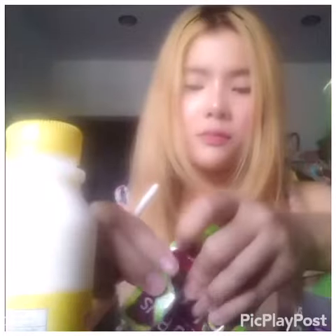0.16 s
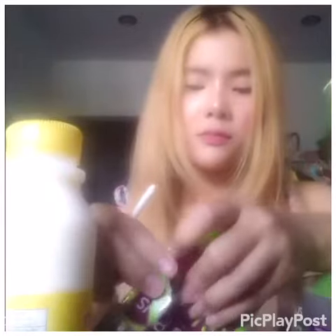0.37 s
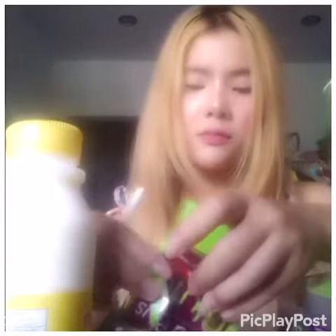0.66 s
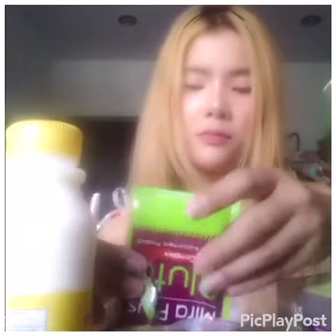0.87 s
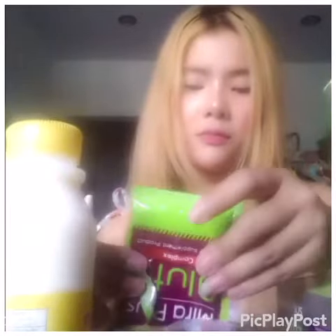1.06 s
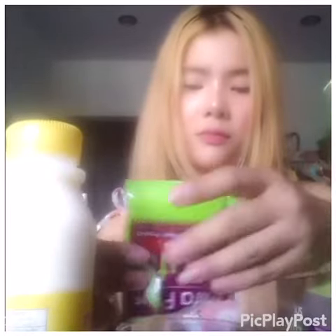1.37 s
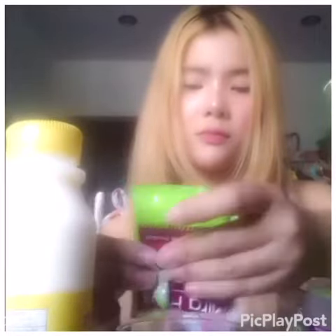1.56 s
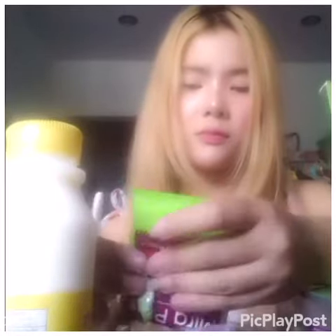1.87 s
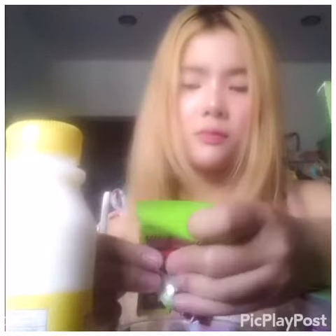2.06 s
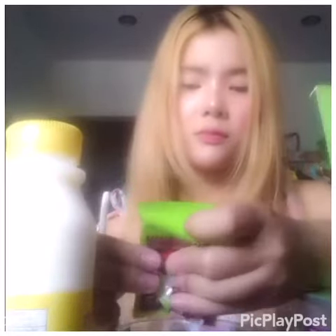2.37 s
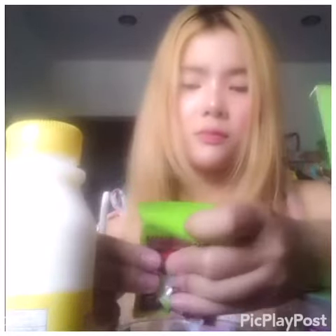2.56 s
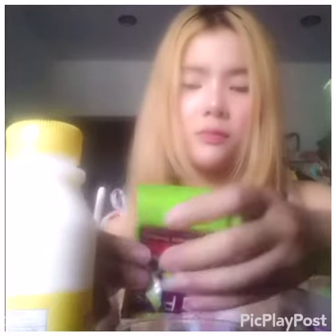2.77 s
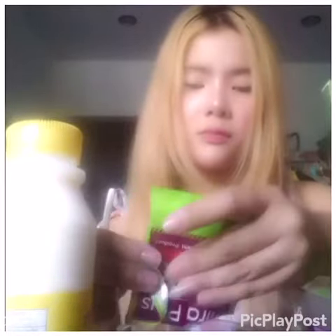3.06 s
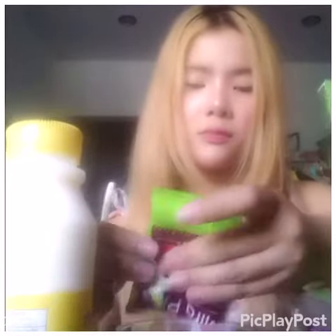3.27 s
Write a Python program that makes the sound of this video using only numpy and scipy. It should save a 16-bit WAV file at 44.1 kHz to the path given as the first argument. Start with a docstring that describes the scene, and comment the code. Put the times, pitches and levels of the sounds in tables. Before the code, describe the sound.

Crisp plastic packet crackling in uneven bursts, handled by fingers near a small microphone.

```python
"""Over faint room rumble and hiss, a foil-lined plastic sachet rustles and snaps, squeezed and worked open by hand.
A small microphone stands close by. Each flex of the film gives a train of tiny ringing creases and sliding hiss;
larger creases snap through one by one as short noise bursts with a ringing facet, and panels give with dull bumps.
The pouch's resonances colour the rustle and the noise of the snaps; the room answers with early reflections
and a short tail."""
import sys
import numpy as np
from scipy import signal
from scipy.fft import rfft, irfft, next_fast_len
from scipy.io import wavfile
from scipy.ndimage import map_coordinates

SR = 44100
rng = np.random.default_rng(int(sys.argv[2]) if len(sys.argv) > 2 else 0)


def to_wav(sig):
    """Store sig (one row per channel, or 1-D mono) as 16-bit WAV at the path in sys.argv[1].

    Samples outside -1..1 are clipped; the rate is SR.
    """
    pcm = np.clip(np.atleast_2d(sig), -1, 1) * 32767
    pcm = np.round(pcm).astype(np.int16)
    wavfile.write(sys.argv[1], SR, pcm.T)  # frames by channels


N = 149940

# shape of the flexed film: time_s, treble_against_rest_db, panel_resonance_hz
FILM_SHAPE = [(.86, 4.5, 1005), (1.22, 1.5, 940), (1.4, 4.5, 740), (1.56, 1, 1080), (1.7, -0.5, 1110),
              (1.92, -2.5, 460), (2.1, 7.5, 800), (2.4, 1.5, 814), (2.8, 5.5, 1060), (2.98, 6, 830),
              (3.2, .5, 785)]


def amp(db):
    """Decibels to a linear factor."""
    return 10 ** (np.asarray(db) / 20)


def unit(x):
    """Scale to an RMS of 1."""
    return x / np.sqrt(np.mean(x ** 2) + 1e-20)


def decay(t, t60):
    """Exponential fall by 60 dB in t60 seconds."""
    return np.exp(-np.log(1000) * t / t60)


def along(points, hz):
    """Interpolate (Hz, value) points on a log-frequency axis."""
    f, v = np.transpose(points)
    return np.interp(np.log(hz + 1), np.log(f + 1), v)


def curve(rows):
    """Interpolate (s, value) points to one value per sample."""
    return np.interp(np.arange(N) / SR, *np.transpose(rows))


def wobble(rate):
    """A smooth random curve with rate knots a second."""
    knots = rng.standard_normal(int(N * rate / SR) + 4)
    return map_coordinates(knots, [np.arange(N) * rate / SR])


def filtered(x, gain):
    """Minimum-phase filter: the folded cepstrum turns a gain over frequency into a causal response."""
    n = x.shape[-1]
    m = 2 * next_fast_len(n)
    log_gain = np.log(np.maximum(gain(np.fft.rfftfreq(m, 1 / SR)), 1e-6))
    cepstrum = irfft(log_gain, m)
    cepstrum[..., 1:m // 2] *= 2
    cepstrum[..., m // 2 + 1:] = 0
    return irfft(rfft(x, m) * np.exp(rfft(cepstrum)), m)[..., :n]


def band(hz, lo, hi, order=6):
    """Gain of a band-pass with smooth shoulders."""
    low_side = 1 + (lo / (hz + 1)) ** (2 * order)
    high_side = 1 + (hz / hi) ** (2 * order)
    return (low_side * high_side) ** -.5


def hump(hz, centre_hz, octaves):
    """A bell of height 1 on a log-frequency axis."""
    return np.exp(-.5 * (np.log2((hz + 1) / centre_hz) / octaves) ** 2)


def floor():
    """Steady room rumble and hiss: noise shaped over frequency."""
    # colour of the room noise: frequency_hz, relative_level_db
    floor_colour = [(28, -19), (40, 2), (60, -7), (135, 3.5), (200, 1.5), (300, -7), (1200, -16.5),
                    (4300, -30.5), (6800, -28), (8800, -26.5), (9450, -11), (10100, -44)]
    floor_db = -52.5
    noise = rng.standard_normal(N)
    return amp(floor_db) * unit(filtered(noise, lambda hz: amp(along(floor_colour, hz))))


def room(x):
    """Early reflections from table and hands, and a short diffuse tail, both made of decaying noise."""
    # decay of the tail: frequency_hz, t60_s
    tail_decay = [(200, 0.3), (1000, 0.085), (4000, 0.23), (10000, 0.07)]
    tail_db, early_db = -19.5, -11.5  # energy of each
    tail_rise_s, early_delay_s, early_fade_s = 0.0072, 0.00209, 0.0027
    hz, t, z = signal.stft(rng.standard_normal(SR // 2), SR, nperseg=256)
    t60_s = along(tail_decay, hz)[:, None]
    tail = signal.istft(z * decay(t, t60_s), SR, nperseg=256)[1]
    t = np.arange(len(tail)) / SR
    tail *= 1 - np.exp(-t / tail_rise_s)
    early = rng.standard_normal(len(t)) * (t > early_delay_s) * np.exp(-t / early_fade_s)
    answer = amp(tail_db) * tail / np.linalg.norm(tail)
    answer += amp(early_db) * early / np.linalg.norm(early)
    return signal.fftconvolve(x, answer)[:N]


def bumps():
    """A whole panel of the pouch gives under the fingers with a soft puff of low noise."""
    # dull bumps: start_s, level_db
    bump_rows = [(.354, -29), (.811, -26), (1.405, -23.5), (1.458, -24), (1.795, -33.5), (1.947, -26),
                 (3.019, -29)]
    lo_hz, hi_hz, t60_s, rise_s = 272, 520, 0.043, 0.0027
    t = np.arange(N) / SR
    push = np.zeros(N)
    for start_s, level_db in bump_rows:
        age = np.maximum(t - start_s, 0)
        push += amp(level_db) * (1 - np.exp(-age / rise_s)) * decay(age, t60_s)
    noise = rng.standard_normal(N)
    return push * unit(filtered(noise, lambda hz: band(hz, lo_hz, hi_hz, order=3)))


def pouch(hz):
    """Gain of the pouch's resonances as they reach the microphone."""
    # resonances: frequency_hz, gain_db
    pouch_gain = [(150, -15.5), (280, -5.5), (380, 5.5), (540, -1.5), (780, 4), (1090, 4), (1420, -7),
                  (1720, 0.5), (2050, -3), (2650, 2.5), (3100, 2), (3700, -4.5), (4350, -10.5),
                  (5600, -4.5), (6700, 0.5), (8300, -2), (9000, -6.5), (9500, 8), (9900, -3.5),
                  (10300, -32.5)]
    return amp(along(pouch_gain, hz))


def panel(x):
    """The bent panel's resonance slides in pitch as the grip changes."""
    peak_db, width_octaves = 2.5, .25
    hz, t, z = signal.stft(x, SR, nperseg=512)
    s, _, centre_hz = np.transpose(FILM_SHAPE)
    bell = hump(hz[:, None], np.interp(t, s, centre_hz), width_octaves)
    return signal.istft(z * amp(peak_db * bell), SR, nperseg=512)[1][:N]


def crackle(count=7, size=6000):
    """A dense train of tiny creases of uneven size, each ringing a few modes (count) of its own."""
    creases_per_s = 900
    spread_db, top_db = 4, 10.5  # mean and largest size, over the smallest crease
    lo_hz, hi_hz = 286, 9990  # range of the modes
    t60_at_1khz_s, damping = 0.013, 0.37  # the ring shortens as this power of frequency
    draw = rng.random((size, 2 + 2 * count))[:int(creases_per_s * N / SR)]
    t = np.arange(SR // 100, dtype=np.float32) / SR
    sizes = amp(np.minimum(-spread_db * np.log(1 - draw[:, :1]), top_db))
    grains = np.zeros((len(draw), len(t)), np.float32)
    for place, weight in zip(draw[:, 2::2].T, draw[:, 3::2].T):
        # modes spread evenly over the square root of frequency
        hz = (np.sqrt(lo_hz) + place[:, None] * (np.sqrt(hi_hz) - np.sqrt(lo_hz))) ** 2
        khz = hz / 1000
        t60 = t60_at_1khz_s / khz ** damping
        ring = np.sin(np.float32(2 * np.pi * hz) * t) * np.exp(np.float32(-np.log(1000) / t60) * t)
        strength = (2 * weight[:, None] - 1) * np.sqrt(np.sqrt(khz) / t60)
        grains += np.float32(strength) * ring
    at = (draw[:, 1:2] * N).astype(int) + np.arange(len(t))
    return unit(np.bincount(at.ravel(), (sizes * grains).ravel(), N)[:N])


def rustle():
    """Tiny creases and film sliding on film, both as loud as the flexing is hard."""
    # how hard the film is flexed: time_s, level_db
    flexing = [(0.04, -53.5), (0.254, -63.5), (0.274, -30.5), (0.294, -51.5), (0.364, -49), (0.449, -60.5),
               (0.69, -59.5), (0.73, -37), (0.803, -43), (0.864, -19), (0.948, -57), (0.998, -35.5),
               (1.088, -29.5), (1.112, -54), (1.138, -50), (1.172, -29), (1.245, -29.5), (1.272, -40.5),
               (1.332, -53), (1.36, -34.5), (1.417, -25), (1.44, -38.5), (1.537, -23), (1.585, -34),
               (1.626, -62), (1.671, -40.5), (1.721, -38), (1.781, -60), (1.796, -46), (1.886, -69),
               (1.901, -41), (1.99, -46.5), (2.105, -37.5), (2.19, -59.5), (2.28, -54.5), (2.325, -31),
               (2.449, -34.5), (2.489, -52.5), (2.565, -23.5), (2.665, -50.5), (2.714, -47), (2.799, -22.5),
               (2.87, -47), (2.903, -44), (2.928, -26.5), (2.973, -24), (3.043, -51), (3.165, -48.5),
               (3.223, -36.5), (3.263, -61), (3.357, -57), (3.367, -33), (3.397, -54)]
    # tilt of the rustle: frequency_hz, gain_db
    rustle_tilt = [(150, 3.5), (400, -5), (1500, -0.5), (4000, -2), (7000, -1), (10000, -10.5)]
    crackle_db, slide_db, flutter_db = -1, -5.5, 2.5
    treble_hz = 4370  # where the treble begins
    film = amp(crackle_db) * crackle() + amp(slide_db) * rng.standard_normal(N)
    coloured = filtered(panel(film), lambda hz: pouch(hz) * amp(along(rustle_tilt, hz)))
    sound = np.std(film) * unit(coloured)
    # body and treble flutter independently
    body = filtered(sound, lambda hz: band(hz, 108, treble_hz)) * amp(flutter_db * wobble(90))
    treble = filtered(sound, lambda hz: band(hz, treble_hz, SR / 2)) * amp(flutter_db * wobble(90))
    tilt_db = curve([(s, db) for s, db, _ in FILM_SHAPE])
    return amp(curve(flexing)) * (body * amp(-tilt_db / 2) + treble * amp(tilt_db / 2))


def snap_level(x):
    """Scale each row so that its energy equals an RMS of 1 over 3 ms."""
    return x / np.sqrt(np.sum(x ** 2, axis=1, keepdims=True) / (0.003 * SR))


def snaps():
    """Each crease lets go in a burst of a few milliseconds and rings the facet of film beside it."""
    # creases that snap through: start_s, main_resonance_hz, low_band_db, middle_band_db, high_band_db
    snap_rows = [(0.1069, 2400, -40.5, -35, -42), (0.263, 6640, -36.5, -30, -31),
                 (0.3153, 2600, -35, -36.5, -33), (0.352, 7340, -23.5, -24.5, -17),
                 (0.5466, 1730, -36, -32.5, -39.5), (0.7058, 2800, -31.5, -30, -35.5),
                 (0.745, 6900, -28.5, -22, -23), (0.7752, 9000, -29.5, -32, -29.5),
                 (0.8177, 790, -37, -28.5, -34), (0.859, 7200, -39, -31, -17.5),
                 (0.8627, 970, -19.5, -21.5, -37), (0.8848, 6770, -35, -16, -18),
                 (0.966, 1720, -52, -37.5, -41), (0.9987, 2680, -31.5, -29.5, -31.5),
                 (1.0775, 6700, -32, -21.5, -18), (1.087, 6830, -32.5, -23.5, -8),
                 (1.1458, 6600, -37, -29.5, -20.5), (1.1823, 7460, -28, -29, -18),
                 (1.2019, 2640, -33, -21, -21.5), (1.2065, 900, -22, -26, -42),
                 (1.2663, 2430, -43, -25, -24), (1.2849, 9200, -26.5, -17.5, -18),
                 (1.4063, 680, -20.5, -22, -30), (1.4482, 7800, -35, -28, -24.5),
                 (1.4609, 3000, -27, -21, -27), (1.477, 3200, -27, -20, -23), (1.5002, 2920, -37, -21, -22),
                 (1.532, 2890, -23.5, -17, -14), (1.5764, 1220, -23, -20.5, -30),
                 (1.6467, 2680, -26.5, -16.5, -18.5), (1.6706, 7870, -43, -34, -19),
                 (1.7109, 1100, -22, -21.5, -32), (1.718, 5900, -28, -29.5, -27.5),
                 (1.7978, 7100, -26.5, -26, -23.5), (1.8325, 6360, -46, -34, -30.5),
                 (1.8369, 5250, -39.5, -31, -28), (1.894, 450, -33, -38, -34.5),
                 (1.935, 2750, -33, -27.5, -31.5), (1.9466, 2640, -33.5, -27, -28),
                 (1.9661, 5430, -40, -30, -28), (1.9976, 6960, -46, -35.5, -33.5),
                 (2.0257, 1040, -33.5, -31.5, -32.5), (2.0524, 6350, -25, -25, -21.5),
                 (2.0713, 454, -29.5, -33.5, -31), (2.1025, 3000, -34, -31, -42),
                 (2.1102, 795, -27, -35, -32), (2.325, 9360, -25.5, -34, -18),
                 (2.3306, 6570, -32, -19.5, -21), (2.367, 1840, -29.5, -25.5, -33),
                 (2.3773, 3320, -24, -19, -19.5), (2.4033, 5400, -33, -26.5, -21),
                 (2.4231, 6570, -34, -52, -21.5), (2.447, 6530, -32, -31.5, -26),
                 (2.4993, 1780, -34, -23, -23), (2.547, 6330, -51, -23, -23),
                 (2.5874, 7400, -29, -20.5, -24), (2.6232, 8000, -34, -40, -27.5),
                 (2.684, 7200, -48, -42, -32.5), (2.7311, 5750, -34.5, -27.5, -25),
                 (2.786, 8430, -33, -21, -11.5), (2.813, 7580, -52, -20, -17),
                 (2.8239, 5370, -46, -27, -20.5), (2.834, 6670, -24, -13.5, -9.5),
                 (2.8591, 2630, -26.5, -17.5, -22.5), (2.9459, 7400, -56, -23, -21.5),
                 (2.9641, 2880, -29.5, -20.5, -19.5), (2.9802, 2860, -44, -24.5, -22),
                 (2.9996, 9250, -31, -31, -18), (3.022, 9100, -32, -37, -30),
                 (3.0313, 2560, -44, -28.5, -28.5), (3.0697, 7540, -34.5, -35, -31.5),
                 (3.0922, 1860, -40, -31, -44), (3.1491, 7020, -47, -31, -20),
                 (3.2086, 2940, -55, -24.5, -29.5), (3.2254, 7730, -38, -34, -18),
                 (3.3077, 1320, -36.5, -45, -52), (3.375, 3060, -40, -43, -32)]
    # bands of a snap: lower_edge_hz, upper_edge_hz, t60_s
    snap_bands = [(286, 1330, 0.0085), (1323, 4000, 0.0057), (4450, 8260, 0.0089)]
    rise_s = 0.00062
    facet_db, facet_t60_s = -0.5, 0.0052  # facet's ring against the noise of its band
    focus_db, focus_octaves = 6, 0.13  # the noise gathers around the main resonance
    out, t = np.zeros(N + SR), np.arange(SR // 20) / SR
    rows = np.array(snap_rows)
    noise = rng.standard_normal((len(rows), len(snap_bands), len(t)))
    rise = 1 - np.exp(-t / rise_s)
    facet_hz = rows[:, 1:2]
    facets = snap_level(np.sin(2 * np.pi * facet_hz * t) * rise ** 2 * decay(t, facet_t60_s))
    # the facet sounds only in the band that holds its resonance
    own_band = np.searchsorted([b[0] for b in snap_bands[1:]], facet_hz)
    for k, (lo, hi, t60) in enumerate(snap_bands):
        def colour(hz):
            focus = amp(focus_db * hump(hz, facet_hz, focus_octaves))
            return pouch(hz) * band(hz, lo, hi, order=4) * focus
        bursts = snap_level(filtered(noise[:, k] * rise * decay(t, t60), colour))
        bursts = snap_level(bursts + amp(facet_db) * facets * (own_band == k))
        for row, burst in zip(rows, bursts):
            start = max(0, round(row[0] * SR))
            out[start:][:len(t)] += amp(row[k + 2]) * burst
    return out[:N]


def scene():
    """The sachet in its room."""
    sachet = snaps() + bumps() + rustle()
    return (sachet + room(sachet) + floor())[None]


def record(dry):
    """Peaks beyond full scale are clipped, then a steep band-pass limits both ends of the spectrum."""
    lo_hz, top_hz = 7.8, 11100
    return filtered(np.clip(dry, -1, 1), lambda hz: band(hz, lo_hz, top_hz, order=24))


dry = scene()
out = record(dry)
to_wav(out)
```